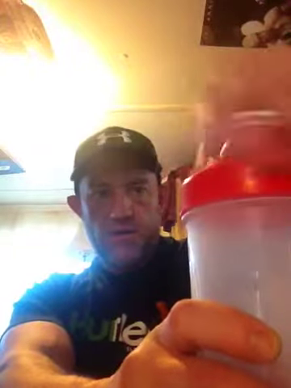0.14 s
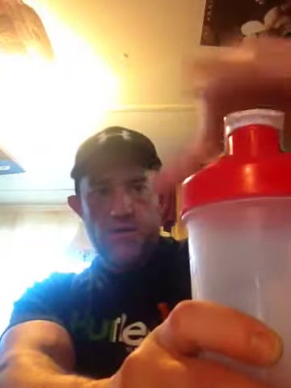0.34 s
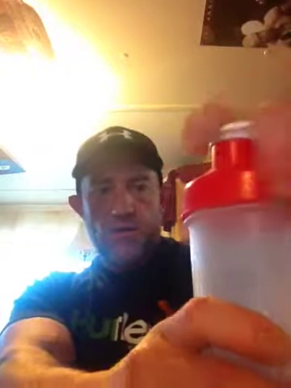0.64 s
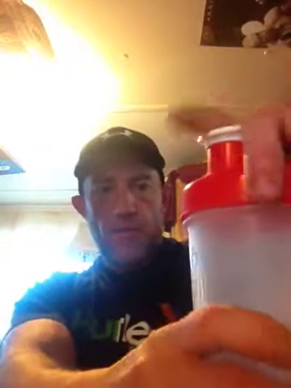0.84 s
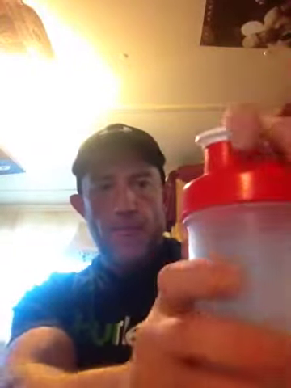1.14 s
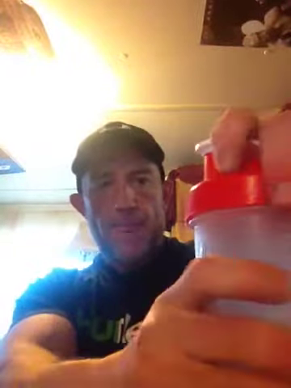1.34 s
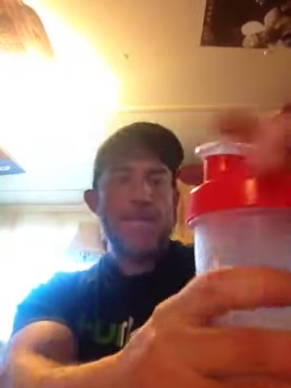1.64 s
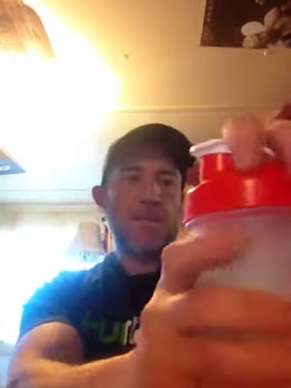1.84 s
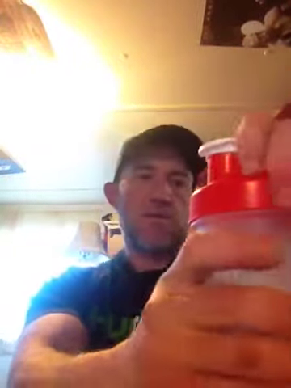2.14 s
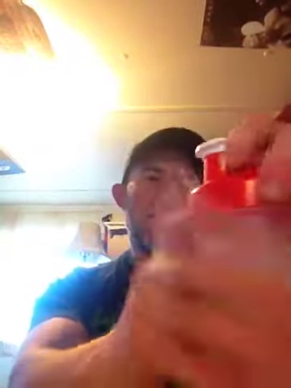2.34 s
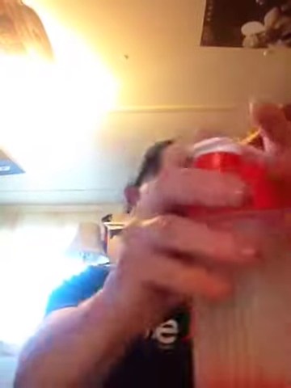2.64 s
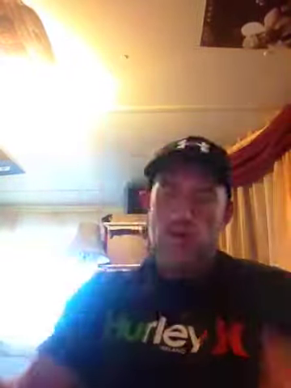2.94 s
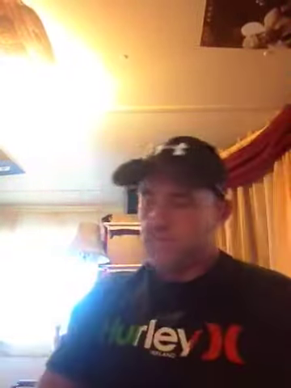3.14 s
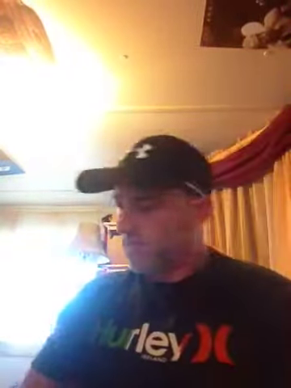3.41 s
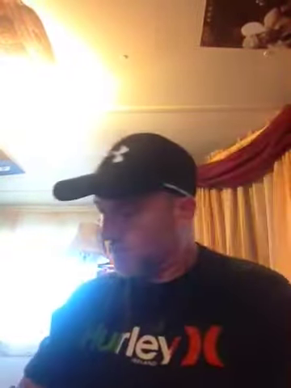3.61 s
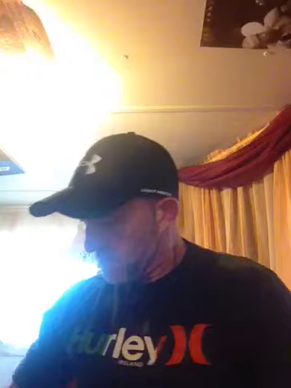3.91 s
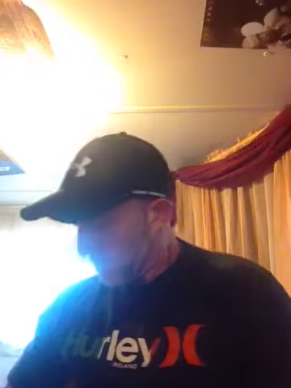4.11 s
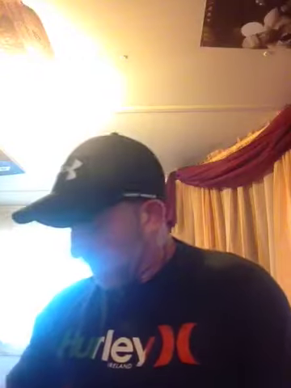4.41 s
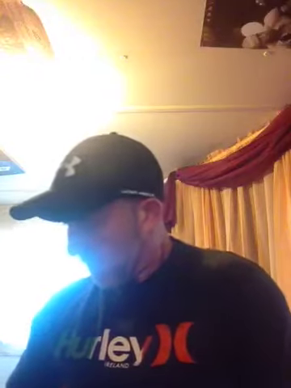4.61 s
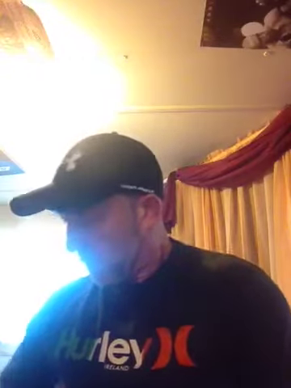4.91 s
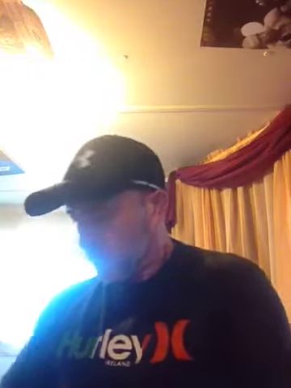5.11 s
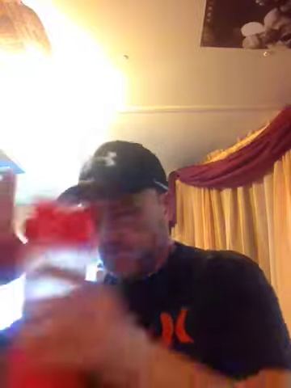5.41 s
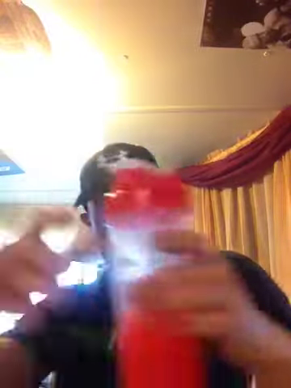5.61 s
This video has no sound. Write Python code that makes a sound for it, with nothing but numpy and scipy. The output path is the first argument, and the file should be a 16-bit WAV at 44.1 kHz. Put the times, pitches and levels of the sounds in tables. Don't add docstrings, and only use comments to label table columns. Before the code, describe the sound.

Fingers rub, thud and twist the cap of a plastic shaker cup, then liquid sloshes sharply inside before the cap clicks open.

```python
import sys
import numpy as np
from scipy import signal
from scipy.fft import rfft, irfft
from scipy.io import wavfile

SR = 44100
rng = np.random.default_rng(int(sys.argv[2]) if len(sys.argv) > 2 else 0)


def waveform_to_disk(signal):
    frames = np.transpose(np.atleast_2d(signal))
    scaled = np.clip(frames, -1, 1) * 32767
    samples = np.round(scaled).astype(np.int16)
    wavfile.write(sys.argv[1], SR, samples)


def attenuation_scalar(level_db):
    decades = np.asarray(level_db, float) / 20
    return 10 ** decades


N = 254093
SPLIT_HZ = 4880

# pitch [hz], level [db], t60 [s]
BODY_MODES = [(120, -3.5, 0.31), (158.2, 7, 0.036), (215, 3, 0.097), (309.5, 3.5, 0.067), (374, -6.5, 0.11),
              (462, -4, 0.061)]
# pitch [hz], level [db], t60 [s]
WALL_MODES = [(637, -1, 0.042), (712, -0.5, 0.048), (879, 3.5, 0.033), (1060, 5.5, 0.018),
              (1240, 3.5, 0.0053), (1450, -7, 0.024)]
# start [s], peak [db], pitch [hz], t60 [s]
AIR_POCKETS = [(3.153, -35.5, 1200, 0.049), (3.161, -26.5, 1450, 0.035), (3.201, -33, 1217, 0.14),
               (3.402, -27, 1384, 0.042), (3.418, -37, 1420, 0.043), (3.6, -40, 1240, 0.14),
               (3.698, -34, 870, 0.1), (3.78, -42, 1450, 0.04), (3.946, -44, 1530, 0.049),
               (3.973, -35.5, 1310, 0.045), (4.166, -45, 1060, 0.097), (4.197, -38, 1430, 0.031),
               (4.567, -32, 1240, 0.018), (4.592, -33, 1340, 0.036), (4.697, -30, 866, 0.044),
               (4.812, -40, 1160, 0.12), (4.84, -49, 1610, 0.064), (4.889, -38.5, 770, 0.073),
               (4.975, -39, 1174, 0.052), (5.168, -39.5, 1190, 0.025)]


def rms_one(x):
    return x / np.sqrt(np.mean(x ** 2) + 1e-20)


def band(x, hz, kind):
    return signal.sosfilt(signal.butter(4, hz, kind, fs=SR, output="sos"), x)


def halves(x, hz, gap=0.014):
    low_hz, high_hz = hz * (1 - gap), hz * (1 + gap)
    low = band(band(x, low_hz, "low"), low_hz, "low")
    high = band(band(x, high_hz, "high"), high_hz, "high")
    return rms_one(low), rms_one(high)


def colour(x, points):
    size = 8192
    hz = np.maximum(np.arange(size // 2 + 1) * SR / size, 1)
    point_hz, point_db = np.transpose(points)
    cepstrum = irfft(np.log(attenuation_scalar(np.interp(np.log(hz), np.log(point_hz), point_db))))
    cepstrum[1:size // 2] *= 2
    cepstrum[size // 2 + 1:] = 0
    response = irfft(np.exp(rfft(cepstrum)))
    return rms_one(signal.fftconvolve(x, response)[:N])


def drift(rate):
    r = np.exp(-32 * np.pi * rate / SR)
    noise = rng.standard_normal(N // 16 + 3002)
    slow = signal.lfilter([1], [1, -2 * r, r * r], noise)[3000:]
    return np.interp(np.arange(N) / 16, np.arange(len(slow)), rms_one(slow))


def patchy(x, edges_hz, patch_db, rate):
    pairs = zip(edges_hz, edges_hz[1:])
    return rms_one(sum(attenuation_scalar(patch_db * drift(rate)) * band(x, pair, "band") for pair in pairs))


def swells(rows, steeper):
    t = np.arange(0, N, 32) / SR
    s, rise, fall, *columns = np.transpose(rows)[:, :, None]
    before = (s - t) / np.maximum(rise, 1e-3)
    after = (t - s) / np.maximum(fall, 1e-3)
    away_db = -20 * np.maximum(before, after)
    gains = [np.sqrt(np.sum(attenuation_scalar(db + k * away_db) ** 2, axis=0)) for db, k in zip(columns, steeper)]
    return [np.interp(np.arange(N) / SR, t, gain) for gain in gains]


def ring(clicks, hz, t60):
    r, w = attenuation_scalar(-60 / (t60 * SR)), 2 * np.pi * hz / SR
    return signal.lfilter([0, np.sin(w)], [1, -2 * r * np.cos(w), r * r], clicks + 1e-18)


def grains(per_s, spread_db):
    where, size, sign = rng.random((3, N // 4))
    used = round(min(per_s * N / SR, N // 4))
    size_db = spread_db * np.minimum(-np.log(1 - size[:used]), 4.2)
    sizes = attenuation_scalar(size_db) * np.sign(sign[:used] - .5)
    return rms_one(np.bincount((where[:used] * N).astype(int), sizes, N))


def struck(modes, per_s, spread_db):
    slips = [grains(per_s, spread_db) for _ in modes]

    def play(drive):
        return sum(attenuation_scalar(db) * ring(s * drive, hz, t60) for s, (hz, db, t60) in zip(slips, modes))

    unit = np.std(play(0.83))
    return lambda drive: play(drive) / unit


def bursts(events, main, side, width, peaky, rise_s):
    out = np.zeros(N)
    for s, db, hz, t60, side_db in events:
        i = round(s * SR)
        t = np.arange(round(np.clip(t60, .004, .3) * SR)) / SR
        shape = (1 - np.exp(-t / rise_s)) * attenuation_scalar(-60 * t / t60)
        piece = main[i:i + len(t)]
        peak = rms_one(signal.lfilter(*signal.iirpeak(hz, 1 / width, fs=SR), piece))
        noise = rms_one(piece + peaky * peak) + attenuation_scalar(side_db) * side[i:i + len(t)]
        out[i:i + len(t)] += attenuation_scalar(db - 5.5) * shape * noise
    return out


def room_hush():
    # pitch [hz], density [db per hz]
    room = [(35, -20), (75, -2.5), (227, 1), (537, -9), (871, -5), (1530, -15.5), (1750, -7.5), (3930, -26),
            (4380, -13.5), (5140, -20), (7100, -20), (9550, -28.5), (14300, -19.5), (15500, -19.5)]
    return attenuation_scalar(-68.5) * colour(rng.standard_normal(N), room)


def rubbing(skin):
    # fastest [s], speed-up [s per 20 db], slow-down [s per 20 db], hiss [db], fine top [db]
    slides = [(0.0, .01, 0.04, -37.5, -57), (0.131, 0, 0.12, -48.5, -84), (0.21, 0.03, 0.0447, -34.5, -53),
              (0.45, 0.15, 0.6, -66, -84), (0.63, 0.0461, 0.14, -44.5, -67), (0.675, 0.1, 0.09, -40, -66.5),
              (0.785, 0.28, 0, -55, -85), (0.88, -0.03, .3, -60, -82), (1.0, 0.24, 0.1, -53.5, -75),
              (1.265, 0.25, 0.38, -46.5, -69.5), (1.455, .6, 0, -50, -77), (1.69, .5, 0.33, -54.5, -75),
              (1.83, 0.38, -0.08, -53.5, -75), (1.96, 0.12, 0.17, -49, -68.5),
              (2.05, 0.37, -0.05, -54.5, -76.5), (2.21, 0.15, 0.22, -52.5, -81),
              (2.41, 0.1, 0.0643, -39, -59), (2.54, 0.12, 0.25, -54, -72.5), (2.735, 0.3, 0.03, -57.5, -80),
              (2.86, -2, 0.9, -73, -93), (2.97, -0.4, 0.5, -69, -90), (5.2, .01, 0.2, -63.5, -87.5),
              (5.33, 0.02, 0.1, -48, -63.5), (5.63, 0.4, 0, -69, -85), (5.76, 0.3, .1, -64.5, -88)]
    hiss, top = swells(slides, [1, 1.04])
    coarse, fine = halves(skin, 8430, gap=0)
    return attenuation_scalar(-0.75 + 1.9 * drift(27.4)) * hiss * coarse + attenuation_scalar(6.0) * top * fine


def squeezing():
    # most force [s], build-up [s per 20 db], release [s per 20 db], rumble [db], creak [db]
    grips = [(0.0, .01, .05, -36, -42.5), (0.132, -0.16, 0.29, -50, -47), (0.21, 0.08, 0.05, -36.5, -41),
             (0.5, .5, 1, -54, -63), (0.68, 0.16, 0.19, -41, -40.5), (1.0, 0.09, 0.14, -29, -41.5),
             (1.08, 0.3, .12, -43, -58), (1.17, 0.3, 0.23, -45, -52.5), (1.27, 0.05, 0.11, -30.5, -47),
             (1.34, 0.04, 0.5, -41, -51), (1.46, 0.42, 0.12, -42, -44.5), (1.715, 0.12, 0.08, -41.5, -63),
             (1.82, 0.06, -0.14, -45.5, -48.5), (1.89, 0.07, 0.07, -43, -54), (2.06, 0.2, 0.08, -42, -49.5),
             (2.17, 0.04, 0.27, -46.5, -56), (2.345, 0.05, 0.14, -38, -48.5), (2.43, 0, 0.09, -36, -42.5),
             (2.56, 0.18, 0.14, -46, -46.5), (2.72, 0.09, 0.06, -32, -44), (2.8, 0, 1, -57, -70),
             (5.325, 0.05, 0.12, -57, -46.5), (5.634, -0.01, 0.05, -67, -56), (5.76, 0, .1, -76, -60)]
    rumble, creak = swells(grips, [1, 2.07])
    low = struck(BODY_MODES, 85, 4.1)(rumble * attenuation_scalar(-7.5))
    return low + struck(WALL_MODES, 500, 4.0)(creak * attenuation_scalar(-4.5))


def knocks():
    # start [s], peak [db], pitch [hz]
    thuds = [(0.007, -39, 155), (0.154, -35, 215), (0.171, -28.5, 220), (0.185, -37, 193),
             (0.196, -29, 188), (0.22, -43, 139), (0.233, -42, 253), (0.298, -37.5, 231), (0.483, -41, 263),
             (0.66, -36, 236), (0.68, -32, 290), (0.698, -37, 193), (0.718, -40, 215), (0.739, -37, 269),
             (0.752, -38.5, 156), (0.897, -39.5, 204), (1.016, -19, 190), (1.05, -31, 204),
             (1.079, -29, 193), (1.1, -30, 209), (1.153, -41, 161), (1.166, -34, 204), (1.186, -42, 220),
             (1.228, -35, 231), (1.239, -40.5, 242), (1.285, -30, 156), (1.298, -33, 204),
             (1.312, -35, 145), (1.33, -28, 227), (1.342, -30.5, 242), (1.359, -38, 306), (1.403, -34, 177),
             (1.425, -40, 270), (1.439, -35, 209), (1.473, -33, 199), (1.5, -39, 145), (1.677, -41, 264),
             (1.697, -37, 194), (1.713, -35, 189), (1.822, -38.5, 322), (1.873, -41.5, 209),
             (1.89, -32, 165), (1.992, -39.5, 292), (2.009, -40, 183), (2.035, -38.5, 199),
             (2.067, -41, 269), (2.082, -40.5, 199), (2.154, -42, 258), (2.361, -27, 158),
             (2.373, -30, 183), (2.405, -33, 145), (2.436, -25.5, 183), (2.459, -33, 199),
             (2.544, -27, 180), (2.559, -33, 161), (2.66, -32, 220), (2.726, -27, 340), (2.757, -38.5, 335),
             (5.16, -52, 215)]
    # start [s], peak [db], pitch [hz], snap [db], t60 [s]
    raps = [(0.135, -30, 205, -3, 0.06), (0.164, -29, 325, -7, 0.11), (0.974, -30, 320, -18, 0.2),
            (0.996, -21.5, 318, -17, 0.087), (1.001, -19.5, 359, -11, 0.087),
            (1.265, -23.5, 244, -14.5, 0.059), (1.256, -46, 400, 4.5, 0.02), (1.277, -32.5, 456, -22, 0.04),
            (1.271, -29, 231, -13, 0.12), (1.458, -32, 274, -18.5, 0.046), (2.1, -39, 700, -13, 0.04),
            (1.801, -36, 447, -11.5, 0.076), (1.812, -45, 650, -3, 0.03), (2.479, -41, 400, -6, 0.03),
            (2.553, -44.5, 900, -2, 0.03), (0.455, -40, 68, -40, 0.35), (0.52, -39, 66, -40, 0.34),
            (2.57, -33, 66, -40, 0.28), (2.3, -37.5, 170, -19, 0.077), (2.34, -24, 340, -16.5, 0.048),
            (2.423, -27.5, 390, 2.5, 0.04), (2.532, -30.5, 374, -4, 0.041),
            (2.692, -21.5, 356, -15.5, 0.083), (2.705, -29.5, 172, -14, 0.16), (1.38, -32.5, 169, -13, 0.1),
            (5.3205, -44.5, 296, 6.5, 0.043), (5.335, -52, 300, -2, 0.044), (5.631, -49, 620, -12, 0.06)]
    thud_snap_db, thud_t60_s = -24.5, 0.045
    blows = raps + [(*row, thud_snap_db, thud_t60_s) for row in thuds]
    out, luck = np.zeros(N), rng.normal(0, 3.55, (len(blows), 12))
    pad = np.hanning(round(0.0023 * SR))
    for (s, db, hz, snap_db, t60), dice in zip(blows, luck):
        i = round((s + 0.00096) * SR)
        click = np.zeros(min(round(np.clip(t60, .05, .25) * SR), N - i))
        click[0] = 1
        push = np.convolve(click, pad / pad.sum())[:len(click)]
        sharp = np.convolve(click, np.hanning(20) / 8.9)[:len(click)]
        low, snap = ring(push, hz, t60), 0
        for (f, d, t), v in zip(BODY_MODES, dice):
            low = low + attenuation_scalar(d - 17.0 + v) * ring(push, f, t60) * np.sign(v)
        for (f, d, t), v in zip(WALL_MODES, dice[6:]):
            snap = snap + attenuation_scalar(d - 8 + v) * ring(sharp, f, 0.86 * t)
        out[i:i + len(click)] += attenuation_scalar(db - 1.5) * (low + attenuation_scalar(snap_db) * snap)
    return out


def cap_ticks(skin):
    # start [s], peak [db], pitch [hz], t60 [s], brightness [db]
    ticks = [(0.1292, -33.5, 3850, 0.014, -19), (0.41, -53, 3530, 0.02, -16),
             (0.4457, -47.5, 3220, 0.036, -20.5), (0.4813, -45, 4540, 0.016, -6),
             (1.0003, -30.5, 2260, 0.035, -31), (1.0996, -32.5, 4570, 0.0091, -10),
             (1.2612, -33, 2680, 0.0093, -20), (2.1725, -32, 3504, 0.012, -4.5),
             (2.4235, -29, 1870, 0.0052, -19), (2.7806, -55, 4390, 0.018, -30),
             (3.0922, -21, 4300, 0.01, -25), (4.4295, -26, 3800, 0.029, -41),
             (4.5945, -36, 1670, 0.015, -18), (1.815, -44, 4000, 0.0087, -10), (2.526, -39, 3400, 0.01, -2),
             (3.015, -58, 4400, 0.015, 0), (5.288, -56, 4600, 0.008, 3.5), (5.301, -46, 1500, 0.012, -20),
             (5.306, -45, 4600, 0.013, -7), (5.3135, -36, 1700, 0.014, -3), (5.3172, -28, 1300, 0.008, -18),
             (5.3214, -27, 1570, 0.011, -20), (5.3355, -30, 1300, 0.0092, -20),
             (5.342, -36, 1800, 0.01, -10), (5.347, -37, 4400, 0.025, -6), (5.2051, -41, 2580, 0.017, -21),
             (5.3171, -34, 4700, 0.012, 0), (5.3215, -19.5, 4760, 0.006, -2),
             (5.3353, -24, 4730, 0.0068, 1), (5.4345, -33, 2020, 0.008, -12)]
    return bursts(ticks, *halves(skin, SPLIT_HZ), width=.15, peaky=.7, rise_s=.0002)


def hands():
    # pitch [hz], density [db per hz]
    friction = [(710, -51.5), (1200, -1.5), (1460, -10), (1860, -5.5), (4530, 1), (5090, -7.5),
                (5730, -7.5), (7330, -14.5), (9890, -40), (14500, -35.5), (15500, -39.5)]
    skin = colour(grains(9000, 1.6), friction)
    return rubbing(skin) + squeezing() + knocks() + cap_ticks(skin)


def slosh():
    # time [s], level [db]
    vigour = [(3.09, -43.5), (3.43, -41), (3.55, -46.5), (3.8, -48), (3.92, -54.5), (3.945, -45.5),
              (4.29, -52), (4.34, -45), (4.6, -49.5), (4.67, -85), (4.73, -43), (4.9, -50), (5.12, -52.5),
              (5.28, -88.5)]
    # strongest [s], settling [s per 20 db], spray [db], mist [db]
    throws = [
        (3.092, 0.19, -37.5, -45.5),
        (3.119, 0.02, -33, -44),
        (3.328, 0.1, -30, -43.5),
        (3.528, 0.26, -38.5, -47),
        (3.706, 0.13, -33.5, -44.5),
        (4.064, 0.15, -41.5, -52),
        (4.31, 0.02, -52, -50),
        (4.5, 0, -57, -64),
        (4.73, 0.08, -42, -60),
        (4.93, 0.18, -50, -57),
    ]
    # strongest [s], settling [s per 20 db], gurgle [db], surge [db]
    returns = [(3.092, -0.5, -44, -60), (3.172, 0.3, -40, -61), (3.235, 0.1, -49, -53),
               (3.422, 0.28, -39, -50), (3.598, 0.3, -44, -56), (3.784, 0.15, -46, -49.5),
               (3.955, 0.5, -48, -55), (4.172, 0.22, -45, -56), (4.25, -0.07, -53, -54.5),
               (4.35, 0.5, -49.5, -59), (4.43, -6.5, -48, -67.5), (4.598, 0.21, -44.5, -56),
               (4.819, 0.27, -47.5, -53.5), (4.89, 0.1, -53.5, -68), (5.02, 0.27, -53, -60.5)]
    throw_rise_s, return_rise_s = 0.026, 0.043
    s, db = np.transpose(vigour)
    wash = attenuation_scalar(np.interp(np.arange(N) / SR, s, db, left=-200, right=-200))
    thrown, mist = swells([(s, throw_rise_s, *rest) for s, *rest in throws], [1, 1])
    gurgle, surge = swells([(s, return_rise_s, *rest) for s, *rest in returns], [1, 1.32])
    moving = wash > 1e-6

    def both(*gains):
        return moving * np.sqrt(sum(g ** 2 for g in gains))

    spray = both(wash, gurgle * attenuation_scalar(-3))
    return (both(spray, thrown), both(spray * attenuation_scalar(-14), mist),
            both(wash * attenuation_scalar(-10.5), gurgle), both(wash * attenuation_scalar(-33), surge))


def slaps(drops, fine):
    # start [s], peak [db], pitch [hz], t60 [s]
    ends = [(3.09, -28.5, 3800, 0.035), (3.111, -28, 4160, 0.098), (3.1614, -34, 2500, 0.038),
            (3.236, -29.5, 4340, 0.13), (3.312, -27, 4500, 0.073), (3.518, -28.5, 2930, 0.15),
            (3.696, -28, 3450, 0.091), (3.95, -32, 4070, 0.059), (3.9844, -33.5, 2590, 0.074),
            (4.058, -32, 4560, 0.091), (4.425, -35, 4000, 0.036), (4.487, -27, 3900, 0.079),
            (4.726, -35, 3280, 0.034), (4.753, -29.5, 2560, 0.057), (4.785, -34, 4470, 0.1),
            (4.938, -38.5, 4450, 0.052), (5.037, -45, 4300, 0.14)]
    # start [s], peak [db], pitch [hz], t60 [s], low part [db]
    dry_lid = [
        (3.0915, -28.5, 8200, 0.057, -14),
    ]
    bright_db = -17.5
    crisp = rms_one(band(drops, 2500, "high"))
    out = bursts([(*row, bright_db) for row in ends], crisp, fine, width=0.062, peaky=0.87, rise_s=0.0028)
    return out + bursts(dry_lid, fine, drops, width=0.12, peaky=5.5, rise_s=0.00037)


def bubbles(low_hz, high_hz, per_s, cycles, tilt_db):
    pitches = np.geomspace(low_hz, high_hz, 14)
    modes = [(hz, tilt_db * np.log2(hz / low_hz), cycles / hz) for hz in pitches]
    return struck(modes, per_s, 3.45)


def spraying(spray, mist, drops, fine):
    clumps = attenuation_scalar(2.0 * drift(16.4))
    fizz = bubbles(2200, 4700, 120, 30, 3.0)(spray * clumps * attenuation_scalar(-9.0))
    patches = patchy(drops, [1410, 2334, 3350, 3790, 5000], 2.0, 30)
    hiss = spray * clumps * attenuation_scalar(-5.5) * patches
    return hiss + mist * attenuation_scalar(1.0 + 1.15 * drift(20)) * fine + fizz


def heavy_drops(drops, fine):
    # start [s], peak [db], pitch [hz]
    hits = [(3.12, -25, 3850), (3.1624, -26, 1460), (3.236, -31, 2250), (3.256, -25, 4300),
            (3.3176, -26, 4530), (3.3272, -24, 4420), (3.339, -27, 4560), (3.3528, -27, 4550),
            (3.4187, -28, 1230), (3.4359, -29, 4290), (3.5296, -26, 4010), (3.5401, -31, 2770),
            (3.5573, -32, 4260), (3.6946, -30.5, 2950), (3.7046, -24, 2770), (3.7119, -30.5, 4410),
            (3.7183, -31, 4410), (3.786, -33, 2720), (3.8428, -35, 4100), (3.883, -40, 1240),
            (3.9515, -32, 4130), (3.9606, -34, 4100), (3.9805, -30, 1940), (4.064, -32, 4430),
            (4.0704, -28, 4440), (4.0767, -34, 4570), (4.085, -34, 4560), (4.2026, -37, 1390),
            (4.2093, -42, 1200), (4.3057, -39, 5590), (4.3355, -38, 2900), (4.3524, -35, 2620),
            (4.4304, -26, 4130), (4.4938, -27, 4090), (4.5015, -28, 4160), (4.5954, -32, 1310),
            (4.6124, -39, 1290), (4.6634, -45, 1730), (4.7275, -34, 3110), (4.751, -29, 2800),
            (4.784, -31.5, 2730), (4.7913, -31, 4170), (4.9785, -39, 4390), (4.9888, -41.5, 2890),
            (5.0374, -41, 3030), (5.0608, -39.5, 4310), (5.103, -45, 1500), (5.1131, -45, 4380)]
    t60_s, bright_db = 0.017, -14
    events = [(s, db - 3, hz, t60_s, bright_db) for s, db, hz in hits]
    return bursts(events, drops, fine, width=0.14, peaky=1.7, rise_s=0.00053)


def necks():
    out = np.zeros(N)
    for s, db, hz, t60 in AIR_POCKETS:
        i, t = round(s * SR), np.arange(round(1.3 * t60 * SR)) / SR
        shape = (1 - np.exp(-t / 0.0019)) * attenuation_scalar(-45 * t / t60)
        tone = np.sin(2 * np.pi * hz * t * (.96 + 0.085 * t / t60))
        out[i:i + len(t)] += attenuation_scalar(db - 8.5) * shape * tone
    return out


def gurgling(gurgle, surge):
    middle, large = bubbles(702, 1972, 250, 20.0, 8.1), bubbles(215, 640, 100, 30, 4.3)
    low_db = -15.5
    events = [(*row, low_db) for row in AIR_POCKETS]
    gulps = bursts(events, middle(0.21), large(1.0), width=0.1, peaky=5.7, rise_s=0.00097)
    flow = middle(gurgle * attenuation_scalar(-4.0 + 2.47 * drift(9.7))) + large(surge * attenuation_scalar(-2.0))
    return gulps + necks() + flow


def bright_pricks(fine):
    # start [s], peak [db]
    pops = [
        (4.2748, -52),
        (4.2912, -52),
        (4.352, -62),
        (4.375, -59),
        (4.383, -59),
        (4.397, -60),
        (4.419, -58),
        (5.4341, -55),
    ]
    highest = halves(fine, 12200)[1]
    events = [(s, db, 13500, 0.012, -40) for s, db in pops]
    return bursts(events, highest, highest, width=.3, peaky=.1, rise_s=.0002)


def liquid():
    # pitch [hz], density [db per hz]
    spectrum = [(1000, -19), (1700, -7.5), (2180, -14.5), (2830, 1.5), (3400, -8.5), (4490, 2), (5060, -8),
                (5550, -10), (7400, -15), (8340, -23.5), (9490, -36), (12900, -34), (14700, -38),
                (15500, -49)]
    spray, mist, gurgle, surge = slosh()
    drops, fine = halves(colour(grains(7000, 1.0), spectrum), SPLIT_HZ)
    splashes = slaps(drops, fine) + heavy_drops(drops, fine) + bright_pricks(fine)
    return splashes + spraying(spray, mist, drops, fine) + gurgling(gurgle, surge)


def walls(x):
    t60_s = 0.088
    t = np.arange(SR // 2) / SR
    tail = rng.standard_normal(len(t)) * attenuation_scalar(-60 * t / t60_s) * (t > .006)
    return signal.fftconvolve(x, tail / np.sqrt(np.sum(tail ** 2)))[:N]


def scene():
    hush = room_hush()
    grip = hands()
    cup = band(grip + liquid(), 120, "high") + attenuation_scalar(-20) * grip
    return (cup + attenuation_scalar(-11.5) * walls(cup) + hush)[None]


def roll_off(x):
    return signal.sosfilt(signal.butter(12, 15800, fs=SR, output="sos"), x)


def record(dry):
    dip_hz, dip_wide_hz, dip_depth = 5050, 170, .85
    dip = signal.lfilter(*signal.iirpeak(dip_hz, dip_hz / dip_wide_hz, fs=SR), dry)
    x = signal.sosfilt(signal.butter(3, 48, "high", fs=SR, output="sos"), dry - dip_depth * dip)
    x = signal.sosfilt(signal.ellip(10, .5, 60, 15330, fs=SR, output="sos"), x)
    return roll_off(x)


dry = scene()
out = record(dry)
waveform_to_disk(out)
```